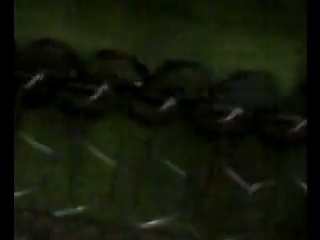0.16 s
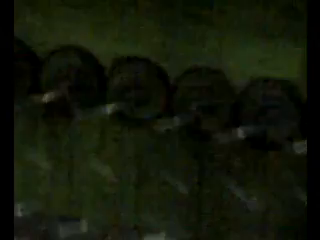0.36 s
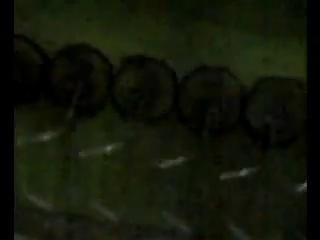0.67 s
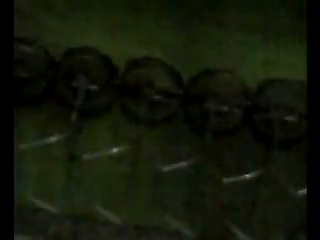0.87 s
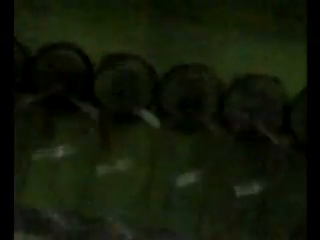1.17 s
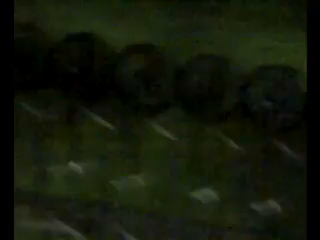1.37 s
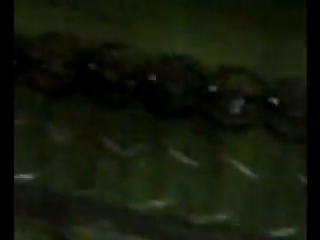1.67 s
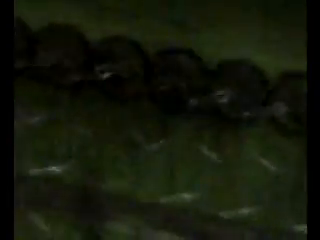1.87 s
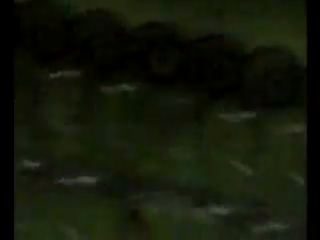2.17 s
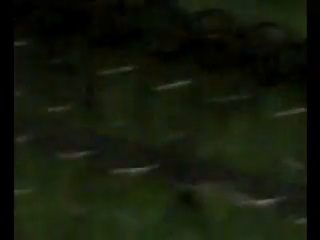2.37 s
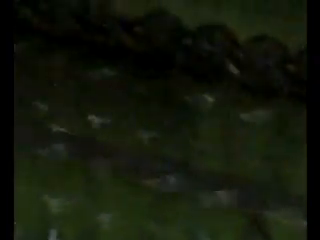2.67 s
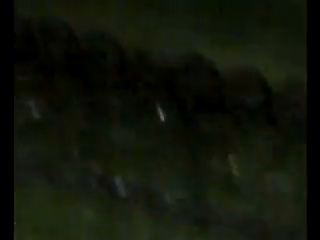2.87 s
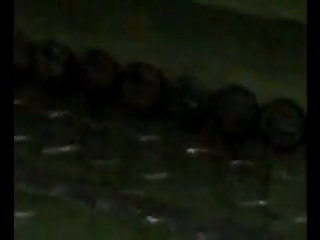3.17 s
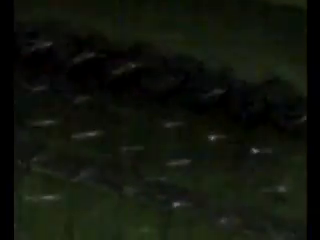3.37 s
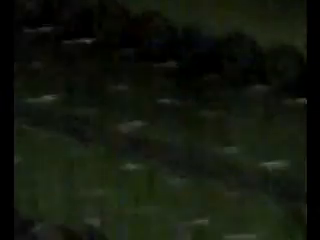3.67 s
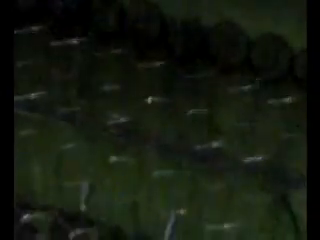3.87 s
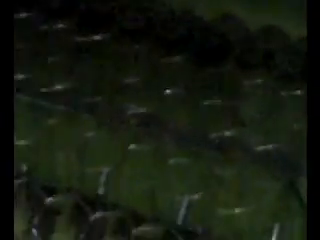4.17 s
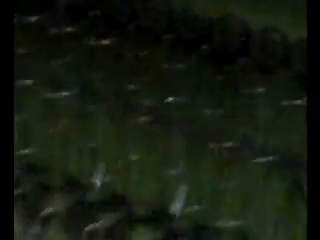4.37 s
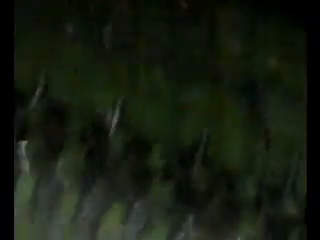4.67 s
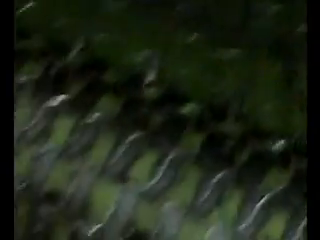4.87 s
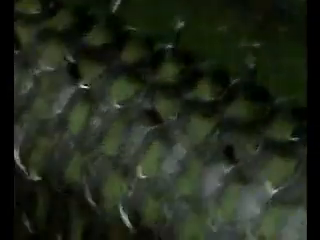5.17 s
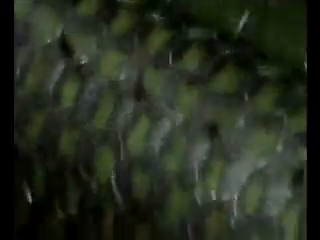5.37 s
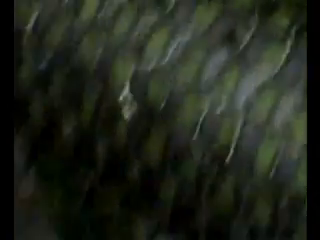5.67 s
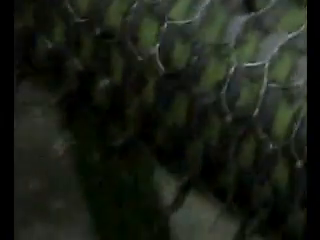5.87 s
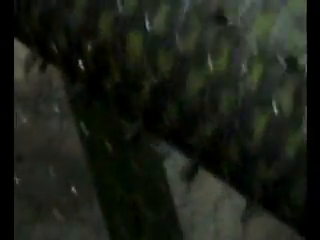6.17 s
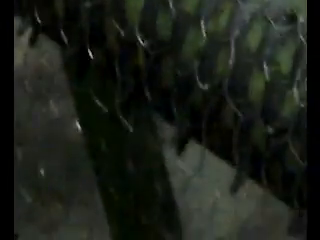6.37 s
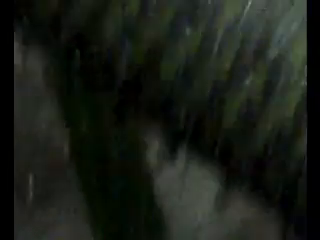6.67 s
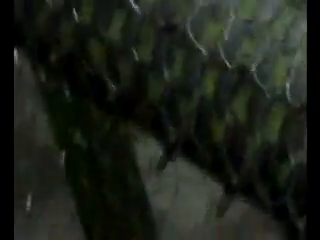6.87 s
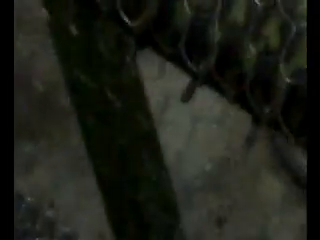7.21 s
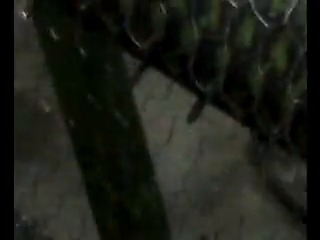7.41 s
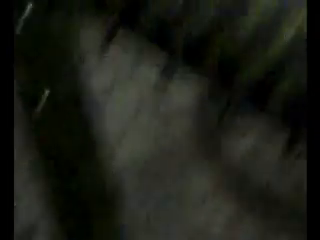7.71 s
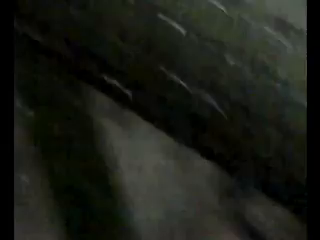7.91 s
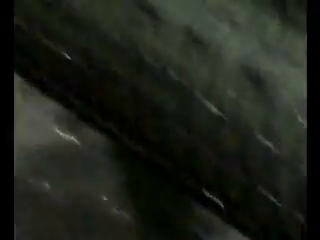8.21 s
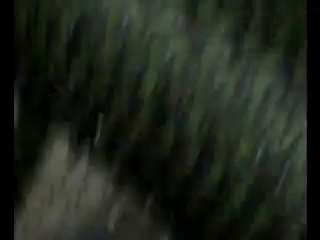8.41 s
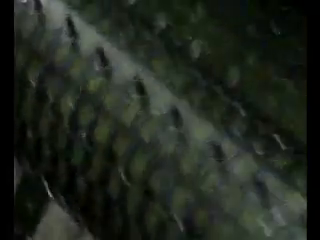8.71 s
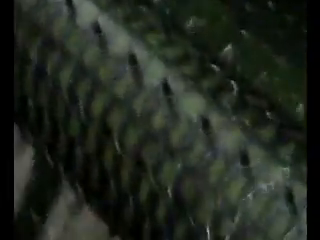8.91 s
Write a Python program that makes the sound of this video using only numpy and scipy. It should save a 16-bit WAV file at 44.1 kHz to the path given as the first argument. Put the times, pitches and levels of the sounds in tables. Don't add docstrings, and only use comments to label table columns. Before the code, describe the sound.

Close, dense metallic rattling from a netting machine, a heavy bar clanking about every 0.8 seconds over gear whine and low motor hum.

```python
import sys
import numpy as np
from scipy import signal
from scipy.io import wavfile
from scipy.ndimage import uniform_filter1d

SR = 44100
rng = np.random.default_rng(int(sys.argv[2]) if len(sys.argv) > 2 else 0)


def gain_from_decibels(decibels):
    exponent = np.asarray(decibels, float) / 20
    return 10 ** exponent


def to_wav(sig):
    pcm = np.clip(np.atleast_2d(sig), -1, 1) * 32767
    pcm = np.round(pcm).astype(np.int16)
    wavfile.write(sys.argv[1], SR, pcm.T)


N = 399105


def evened(x):
    return x / np.sqrt(np.mean(x ** 2) + 1e-20)


def smooth_noise(count, size):
    return evened(uniform_filter1d(rng.standard_normal(count), size=size))


def add(mix, s, sound):
    part = mix[round(s * SR):][:len(sound)]
    part += sound[:len(part)]


def wash(spectrum, patchy_db, flicker_db, size=512):
    frames, bins_hz = 4 * N // size + 5, np.fft.rfftfreq(size, 1 / SR)
    real, imag, patches = rng.standard_normal((frames, len(bins_hz), 3)).T
    patches = uniform_filter1d(patches, size=4, axis=0)
    patches = evened(uniform_filter1d(patches, size=12, axis=1))
    flicker = smooth_noise(frames, size=8)
    hz, db = np.transpose(spectrum)
    shape = np.interp(np.log(bins_hz + 1), np.log(hz), db, left=-60, right=-100)
    gain = gain_from_decibels(shape[:, None] + patchy_db * patches + flicker_db * flicker)
    sound = signal.istft((real + 1j * imag) * gain, nperseg=size, noverlap=size * 3 // 4)[1]
    return evened(sound[:N])


def ring(hz, t60, rough, length=.3):
    t = np.arange(round(length * SR)) / SR
    beat = 1 + rough * np.minimum(t / 0.017, 1) * smooth_noise(len(t), size=90)
    onset = np.minimum(t / 0.00053, 1)
    return gain_from_decibels(-60 * t / t60) * beat * np.sin(2 * np.pi * hz * t) * onset


def wobble(rate_hz):
    size = round(SR / 64 / rate_hz)
    slow = evened(uniform_filter1d(rng.standard_normal(N // 64 + 2), size=size, mode="wrap"))
    return np.interp(np.arange(N) / 64, np.arange(len(slow)), slow)


# time in seconds, loudness of the clatter in dB.
NEARNESS = [(0.0, -16), (0.38, -16), (1.84, -17), (2.07, -15.5), (3.0, -15), (3.93, -16), (5.44, -15.5),
            (5.85, -16), (6.02, -14), (6.53, -16.5), (6.96, -12.5), (7.49, -14.5), (7.59, -12.5),
            (9.05, -12.5)]


def nearness(t):
    return np.interp(t, *np.transpose(NEARNESS)) + 16


# start in seconds, then extra rumble, growl, gear tone and rattle in dB.
TURNS = [(-.28, 4, 5.5, 8, -2.5), (0.55, 5, 5, -4, 1.5), (1.33, 2.5, 2, 2, 1), (2.08, 7, 6, -2, 3),
         (2.92, 3.5, 5.5, -11, 0.5), (3.74, 2.5, 4, -1, -0.5), (4.48, 3.5, 7, 8.5, 2.5),
         (5.27, 5.5, 3.5, 11, 3), (6.08, 4, 3.5, 7, 0), (6.87, 3, 6.5, 8, -0.5), (7.62, 6, 5.5, 11, 1.5),
         (8.44, 3.5, 8.5, 8, 2)]
RUMBLE, GROWL, GEAR, RATTLE = 1, 2, 3, 4


def strokes(column):
    bite_s, turn_s, stop_s, sag = 0.03, .38, 0.045, 0.55
    corners = [0, bite_s, bite_s + turn_s, bite_s + turn_s + stop_s]
    t, out = np.arange(N) / SR, np.zeros(N)
    for row in TURNS:
        out += row[column] * np.interp(t - row[0], corners, [0, 1, 1 - sag, 0])
    return out


def level(rest_db, near, stroke, wobble_db, column):
    moving = near * nearness(np.arange(N) / SR) + stroke * strokes(column)
    return gain_from_decibels(rest_db + moving + wobble_db * wobble(rate_hz=8))


# pitch in Hz, width in Hz, level in dB.
FRAME_TONES = [(999, 110, -9.5), (1306, 88, -4.5), (1670, 100, 0.5), (2034, 82, 1.5), (2426, 160, -6.5),
               (2950, 340, -8.5), (4470, 260, -12), (5620, 1300, -8.5)]


def spindles(modes, spread_db):
    ticks_per_s = 1500
    force = gain_from_decibels(spread_db * np.minimum(rng.exponential(1, N), 4))
    force *= rng.random(N) < ticks_per_s / SR
    force *= rng.choice([-1, 1], N)
    place = rng.integers(0, 3 * len(modes), N)
    t, out = np.arange(3000) / SR, np.zeros(N)
    for k, (hz, width, db) in enumerate(modes * 3):
        pitch = hz * rng.uniform(0.94, 1.03)
        tap = gain_from_decibels(db) * np.exp(-np.pi * width * t) * np.sin(2 * np.pi * pitch * t)
        out += signal.oaconvolve(force * (place == k), tap * np.sqrt(width))[:N]
    return evened(out)


def blend(hall, direct, share):
    return np.sqrt(1 - share) * hall + np.sqrt(share) * direct


# pitch in Hz, strength in dB per Hz.
STEEL_COLOUR = [(450, -25), (650, -8), (1000, -5), (1450, -5.5), (1670, -3), (2030, -4.5), (2500, -4.5),
                (3000, -12.5), (3600, -21)]
# pitch in Hz, strength in dB per Hz.
WIRE_COLOUR = [(2500, -3), (3000, -1.5), (4000, -2), (5000, -3.5), (5600, -6), (6200, -8), (6500, -12.5),
               (6700, -33), (6900, -11), (7400, -39)]


def clatter():
    steel_hall = wash(STEEL_COLOUR, patchy_db=1.5, flicker_db=0.1)
    steel = blend(steel_hall, spindles(FRAME_TONES[:6], spread_db=2.0), share=0.19)
    wire_hall = wash(WIRE_COLOUR, patchy_db=0.48, flicker_db=-0.98)
    wire = blend(wire_hall, spindles(FRAME_TONES[6:], spread_db=-1.0), share=0.14)
    jolts = gain_from_decibels(0.73 * smooth_noise(N, size=700))
    out = level(-17.5, near=1.0, stroke=0.5, wobble_db=0.52, column=RATTLE) * steel
    out += level(-21, near=1.0, stroke=0.6, wobble_db=0.25, column=RATTLE) * wire
    return jolts * lead_in() * out


# pitch in Hz, time to fade by 60 dB in seconds.
BAR_TONES = [(800, .14), (1880, .13), (1975, .22), (1730, .1), (2950, .05), (2180, .12)]
# start in seconds, peak in dB, then low tone, upper tone and crash
# in dB against the peak.
BAR_BLOWS = [(0.3064, -2.5, -11, -4, -9), (1.0923, -2.5, -15, -7.5, -7), (1.8944, -3, -13, -5.5, -5.5),
             (2.6852, 0.5, -18.5, -10, -7), (3.49, -2.5, -6, -13, -8), (4.2842, -7, -13, -14, -1.5),
             (5.08, -3, -15, -5, -6.5), (5.8635, -4, -10.5, -12, -4), (6.6682, -2.5, -20, -8, -7),
             (7.453, -2.5, -14.5, -8, -2), (8.2478, -2.5, -18, -8, -6), (9.0252, -1, -18, -4.5, -1.5)]


def clanks():
    out, crash, t = np.zeros(N), np.zeros(N), np.arange(SR // 2) / SR
    for s, db, low_db, upper_db, crash_db in BAR_BLOWS:
        levels = gain_from_decibels(db + np.array([low_db, -8, -9, -12, upper_db, -12]))
        for gain, (hz, t60) in zip(levels, BAR_TONES):
            add(out, s, gain * ring(hz * rng.uniform(0.94, 1.015), t60 * 0.76, rough=0.61))
        contact = ring(2200, 0.033, rough=.3)
        contact += 0.4 * ring(2600, 0.027, rough=.3) + 0.22 * ring(4400, .09, rough=.9)
        add(out, s, gain_from_decibels(db - 5.5) * contact)
        swell = np.minimum(.35 + t / 0.03, 1)
        add(crash, s, gain_from_decibels(db + crash_db - 3.0 - 60 * t / 0.69) * swell)
    shaken = [(600, -11), (900, -7.5), (2000, 1.0), (3200, -6), (4500, -9.0), (6000, -10.0),
              (6500, -17.5), (7200, -58.5)]
    return out + crash * wash(shaken, patchy_db=0.5, flicker_db=-0.5, size=256)


def lead_in():
    t, rise = np.arange(N) / SR, np.zeros(N)
    for row in BAR_BLOWS:
        rise += np.interp(t - row[0], [-0.12, -.004, 0], [0, 1, 0], left=0, right=0)
    return gain_from_decibels(0.5 * rise)


# start in seconds, peak in dB, pitch in Hz, ring in dB against the peak,
# time for the snap to fade by 60 dB in seconds.
PIN_TICKS = [(0.0633, -7, 5650, -11, 0.04), (0.8555, -13, 5647, -4, 0.058), (1.6467, -9.5, 5540, -5, 0.04),
             (2.4335, -9, 5680, -4, 0.04), (3.225, -5, 5460, -9.5, 0.033), (4.0417, -12, 5400, -5, 0.04),
             (4.816, -6.5, 5560, -6.5, 0.037), (5.5973, -5.5, 5620, -6.5, 0.034),
             (6.4058, -6, 5400, -8, 0.04), (7.1871, -4, 5030, -10, 0.053), (7.9904, -1.5, 5270, -11, 0.04),
             (8.774, 1, 5110, -9, 0.033)]


def pins():
    out, snap, t = np.zeros(N), np.zeros(N), np.arange(SR // 2) / SR
    for s, db, hz, ring_db, t60 in PIN_TICKS:
        tone = ring(hz, 0.04, rough=0.6) + 0.4 * ring(hz * .96, 0.08, rough=0.8)
        add(out, s, gain_from_decibels(db + ring_db) * tone)
        add(snap, s, gain_from_decibels(db - 7.5 - 60 * t / t60))
    snapped = [(2500, -20), (3400, 3.0), (4200, 0.0), (5400, 2), (5900, -9), (6500, -14),
               (7500, -29)]
    return out + snap * wash(snapped, patchy_db=1.0, flicker_db=-2.5, size=256)


# start in seconds, peak in dB, pitch in Hz.
SMALL_KNOCKS = [(0.7188, -10, 1707), (2.1755, 5, 1660), (2.2648, -1, 1590), (2.5326, -2, 2020),
                (2.7696, 4, 2040), (2.8275, 4, 1670), (3.0121, 1, 1570), (3.7, 3, 1560), (4.4094, 3, 2160),
                (4.4468, 3, 1980), (4.5288, 2.5, 1670), (4.6594, -7, 1950), (5.0574, 5, 1940),
                (6.0482, -11, 1620), (6.1015, 5, 1700), (6.8598, 2, 2100), (6.9194, -5, 2590),
                (7.4844, -2, 1650), (7.5233, -3, 1930), (7.8101, -8, 1630), (8.4562, 7, 1860),
                (8.8458, 1, 2460), (8.9535, 3, 1850)]


def knocks():
    out = np.zeros(N)
    for s, db, hz in SMALL_KNOCKS:
        tone = ring(hz, 0.069, rough=0.46) + 0.49 * ring(hz * 1.25, 0.066, rough=0.8)
        add(out, s, gain_from_decibels(db - 14) * tone)
    return out


# start in seconds, peak in dB, pitch in Hz.
WIRE_SLAPS = [(0.2144, -9, 2940), (0.5225, -2, 2680), (0.6569, -7, 2730), (1.1444, -4, 4470),
              (2.7194, -15, 2970), (2.824, -3.5, 3630), (3.1434, -14, 4430), (4.3286, -3, 4340),
              (4.5494, -9, 2740), (5.0996, -4, 3980), (6.1134, -13, 3630), (6.951, -17, 2590),
              (7.3701, -12, 2950), (7.5656, -2, 3930)]


def slaps():
    out = np.zeros(N)
    for s, db, hz in WIRE_SLAPS:
        tone = ring(hz, 0.14, rough=0.69) + 0.5 * ring(hz * 1.07, 0.06, rough=.9)
        add(out, s, gain_from_decibels(db - 12) * tone)
    return out


# middle in seconds, peak in dB, pitch in Hz.
CLOSE_CRACKS = [
    (2.6855, 0, 2400),
    (3.0284, 2, 3000),
    (5.0984, -3, 3000),
    (7.1862, 3, 4000),
    (7.4635, 3, 3200),
    (7.7121, 2.5, 3200),
    (7.9920, 3.5, 4000),
    (8.2480, -1, 2400),
    (8.7751, -9, 4500),
]


def cracks():
    out, t = np.zeros(N), np.arange(-40, 40) / SR
    for s, db, hz in CLOSE_CRACKS:
        add(out, s + t[0], gain_from_decibels(db) * np.exp(-(t * hz / .6) ** 2) * np.cos(2 * np.pi * hz * t))
    return out


# pitch in Hz, strength in dB per Hz.
RACK_COLOUR = [(110, -27), (160, -0.5), (210, -0.5), (280, 4.5), (360, -0.5), (420, 0), (520, -21)]
# pitch in Hz, strength in dB per Hz.
GROWL_COLOUR = [(340, -23), (420, -3), (520, 2), (650, -3), (850, -15)]
# pitch in Hz, strength in dB per Hz.
ROLLER_COLOUR = [(240, -24), (290, -2.5), (340, -4.5), (400, -0.5), (470, -25)]


def racks():
    rumble = wash(RACK_COLOUR, patchy_db=1.0, flicker_db=-0.4, size=1024)
    growl = wash(GROWL_COLOUR, patchy_db=-0.16, flicker_db=-0.5, size=1024)
    boom = wash(ROLLER_COLOUR, patchy_db=0.0, flicker_db=3.5, size=1024)
    out = level(-29, near=0.4, stroke=1, wobble_db=.8, column=RUMBLE) * rumble
    out += level(-30, near=0.47, stroke=0.95, wobble_db=1.16, column=GROWL) * growl
    return out + level(-36.5, near=2.93, stroke=0.24, wobble_db=1.0, column=GEAR) * boom


# pitch in Hz, pitch wander as a share of it.
GEAR_TONES = [(352, .006), (1020, .005), (1675, .012), (3930, .001)]
# level in dB, share of the nearness, share of the stroke, slow wobble in dB.
GEAR_LEVELS = [(-41, 1.7, 0.98, 5), (-37, 1.3, .2, 1.0), (-29.5, 0.46, .1, 1.0), (-37.5, 0.59, .05, 2.5)]


def gears():
    out = np.zeros(N)
    for (hz, waver), part in zip(GEAR_TONES, GEAR_LEVELS):
        wander, flutter = smooth_noise(N, size=1500), smooth_noise(N, size=1500)
        turns = np.cumsum(hz * (1 + waver * (wander + wobble(rate_hz=5.98)))) / SR
        out += level(*part, column=GEAR) * gain_from_decibels(1.0 + 4.4 * flutter) * np.sin(2 * np.pi * turns)
    return out


# pitch in Hz, waver in Hz, level in dB.
WHINE_TONES = [(76.1, 5, -43), (184.3, 5.7, -46.5), (212, 12, -37)]


def whine():
    t, out = np.arange(N) / SR, np.zeros(N)
    for hz, width, db in WHINE_TONES:
        r = np.exp(-np.pi * width / SR)
        noise = rng.standard_normal(N) + 1j * rng.standard_normal(N)
        drift = signal.lfilter([1 - r], [1, -r], noise)
        out += gain_from_decibels(db) * evened((drift * np.exp(2j * np.pi * hz * t)).real)
    return out


def shaft():
    t = np.arange(N) / SR
    beat_s, top_s, depth = 1.57, 2.85, .6
    beat = 1 + depth * np.cos(2 * np.pi * (t - top_s) / beat_s)
    hum = beat * np.sqrt(2) * np.sin(2 * np.pi * 37.5 * t)
    return level(-43.5, near=1.5, stroke=-0.44, wobble_db=3.5, column=RUMBLE) * hum


# pitch in Hz, strength in dB per Hz.
DRONE_COLOUR = [(15, -16.5), (30, -14.5), (50, 0), (75, -4.5), (120, -0.5), (145, -7), (200, -22.5)]


def drone():
    low = wash(DRONE_COLOUR, patchy_db=0.5, flicker_db=0.4, size=4096)
    return level(-37, near=1.36, stroke=0.17, wobble_db=1.5, column=RUMBLE) * low


def scene():
    mix = clatter() + clanks() + pins() + knocks() + slaps() + cracks()
    mix += racks() + gears() + whine() + shaft() + drone()
    return np.array([mix, mix])


# pitch in Hz, chance in sigmas (higher is surer).
BAND_CHANCE = [(2000, 6), (3000, 3.), (5000, 2.4), (5800, 1.7), (6100, .6), (6300, 1.1), (6600, .5),
               (6750, -1.2), (6900, .9), (7100, .2), (7300, -1.8), (8400, -3), (9000, -1.6), (9600, -.8),
               (9900, -1.8), (10100, -4)]
# pitch in Hz, limit in dB against their neighbours.
FAINT_LIMIT = [(3000, -30), (5500, -14), (6200, -6), (6700, -1), (7200, 1.5), (10000, 3)]


def thinned(x):
    hz, t, z = signal.stft(x, SR, nperseg=1024, noverlap=768)
    chance = rng.standard_normal((len(hz) // 4 + 1, len(t) // 6 + 1))
    chance = np.repeat(np.repeat(chance, 4, axis=0), 6, axis=1)[:len(hz), :len(t)]
    limit = np.interp(hz, *np.transpose(BAND_CHANCE))[:, None]
    kept = chance < limit + .25 * nearness(t) * (hz[:, None] > 8800)
    power = uniform_filter1d(abs(z) ** 2, size=5, axis=1)
    near = np.sqrt(abs(uniform_filter1d(power, size=16, axis=2)))
    strong = abs(z) > near * gain_from_decibels(np.interp(hz, *np.transpose(FAINT_LIMIT)))[:, None]
    return signal.istft(z * kept * strong, SR, nperseg=1024, noverlap=768)[1][:, :N]


# start in seconds, lowest and highest pitch in Hz, level in dB.
SIDE_PUFFS = [
    (.488, 4650, 5670, -32),
    (1.255, 5160, 6290, -36),
    (3.553, 4260, 5180, -33),
    (3.855, 4230, 6240, -32),
    (7.895, 4650, 5670, -29),
    (8.476, 5160, 6290, -33),
]


def splits():
    out = np.zeros(N)
    for s, low_hz, high_hz, db in SIDE_PUFFS:
        band_filter = signal.butter(6, [low_hz, high_hz], "band", fs=SR, output="sos")
        band = signal.sosfilt(band_filter, rng.standard_normal(2000))
        add(out, s, gain_from_decibels(db) * evened(band * np.hanning(2000)))
    return np.array([out, -out])


def roll_off(x):
    return signal.sosfilt(signal.butter(12, 15800, fs=SR, output="sos"), x)


def record(dry):
    squeezed = dry / (1 + (abs(dry) / .96) ** 6) ** (1 / 6)
    low_pass = signal.firwin(63, 6600, window=("kaiser", 7), fs=SR)
    narrow = signal.oaconvolve(squeezed, low_pass[None], "same")
    fold_hz = 16000
    mirror = narrow * np.cos(2 * np.pi * fold_hz * np.arange(N) / SR)
    band_pass = signal.firwin(255, [7600, 9900], pass_zero=False, window=("kaiser", 9), fs=SR)
    mirror = signal.oaconvolve(mirror, band_pass[None], "same")
    offset = -.0032
    wave = np.clip(thinned(narrow + gain_from_decibels(-11.5) * mirror) + splits() + offset, -1, 1)
    return roll_off(wave)


dry = scene()
out = record(dry)
to_wav(out)
```